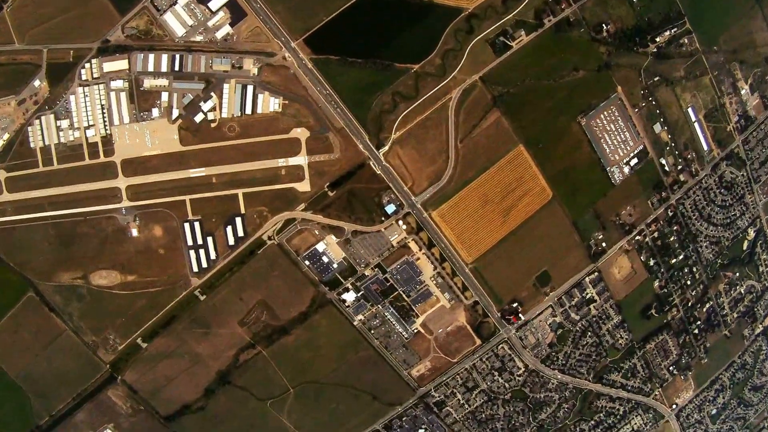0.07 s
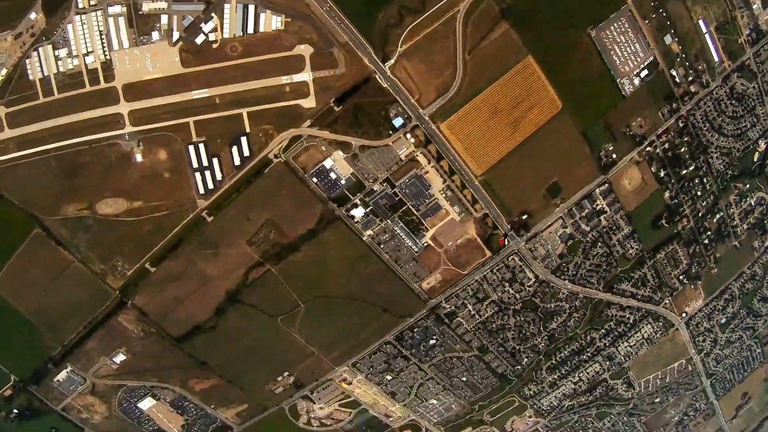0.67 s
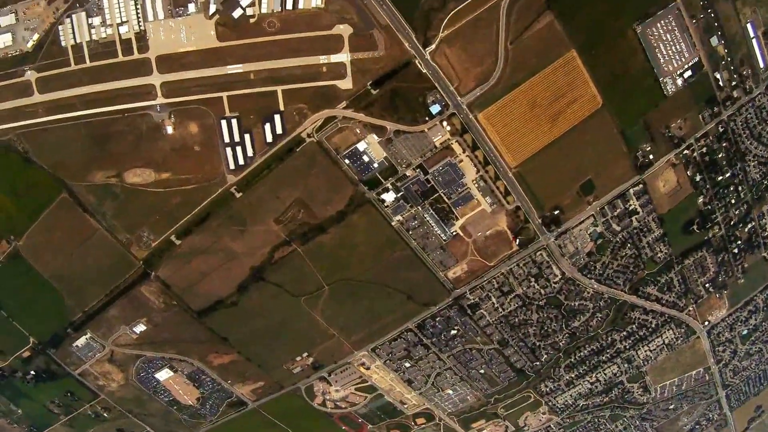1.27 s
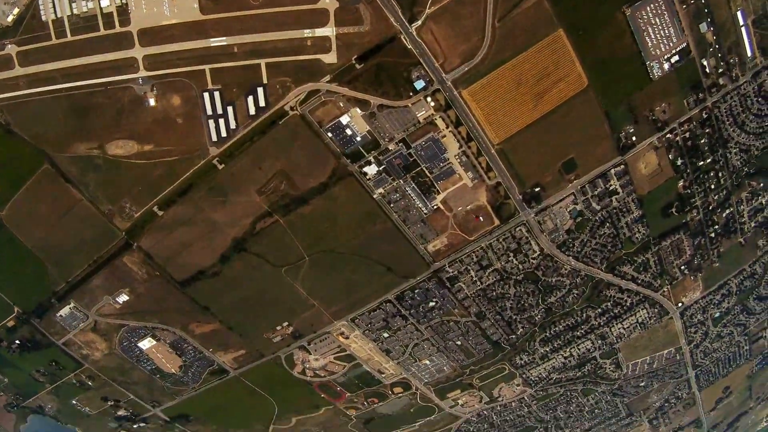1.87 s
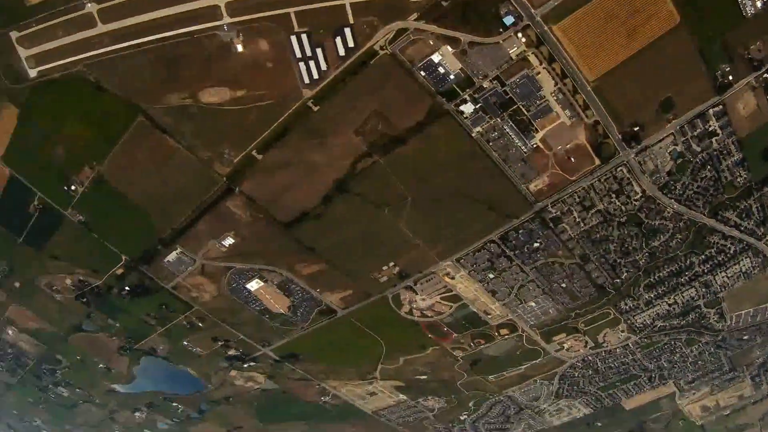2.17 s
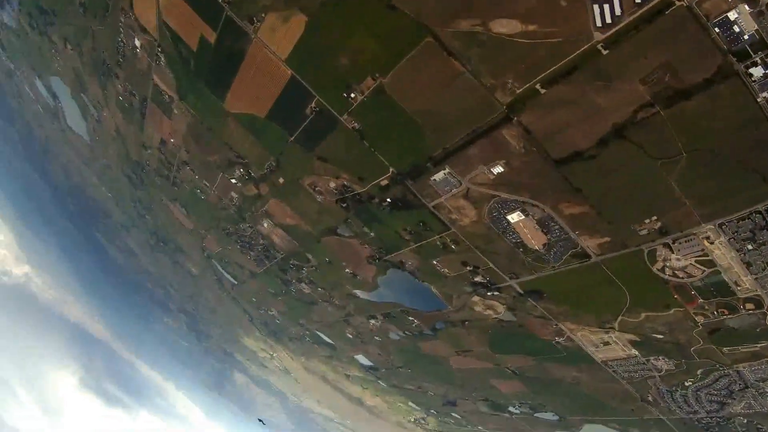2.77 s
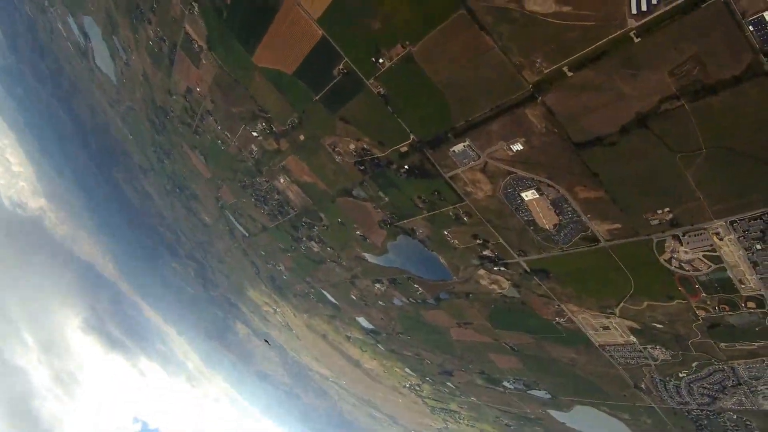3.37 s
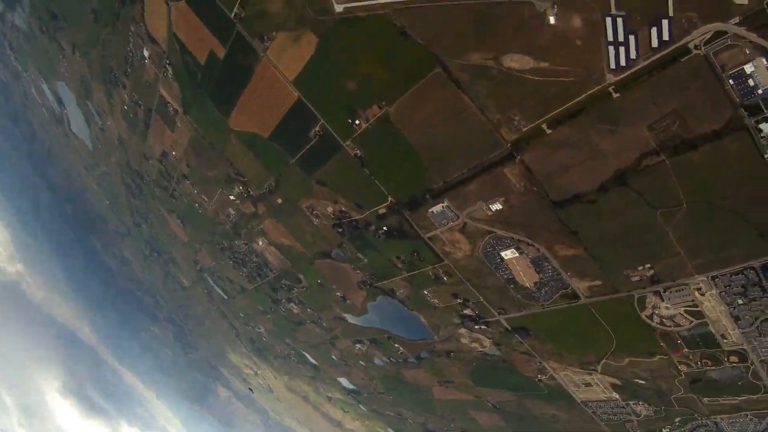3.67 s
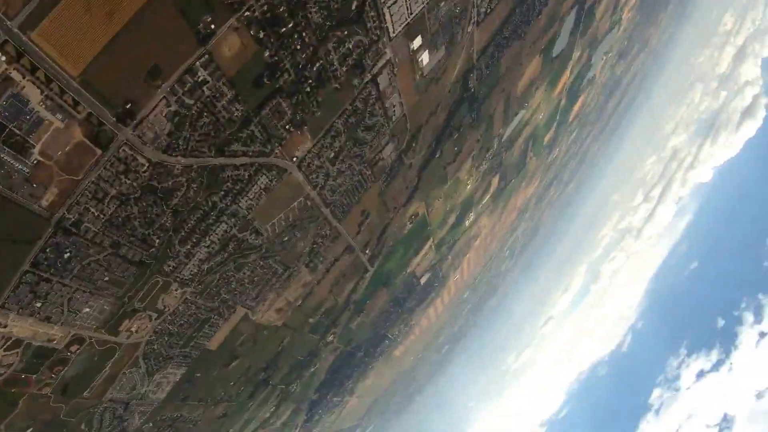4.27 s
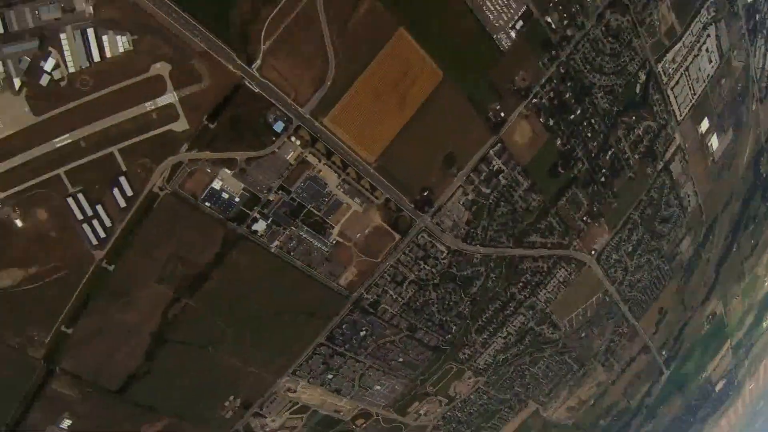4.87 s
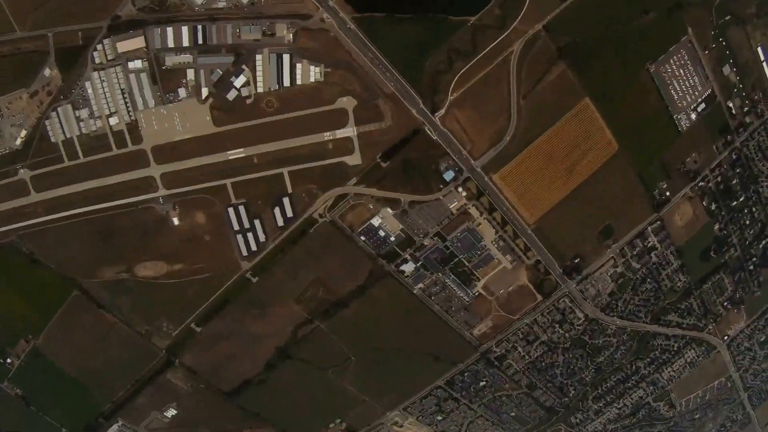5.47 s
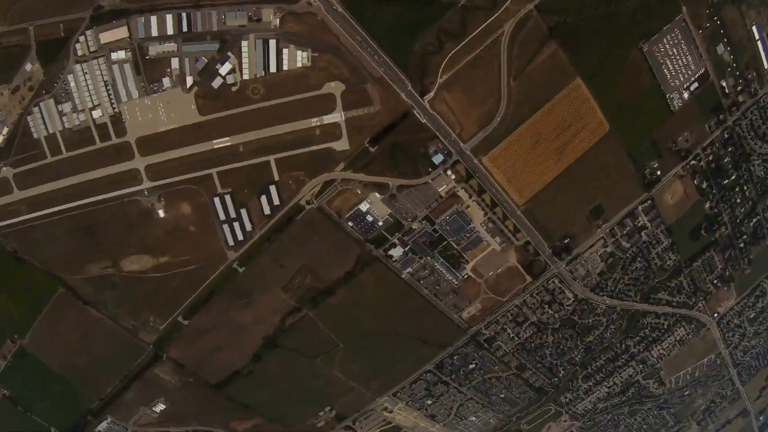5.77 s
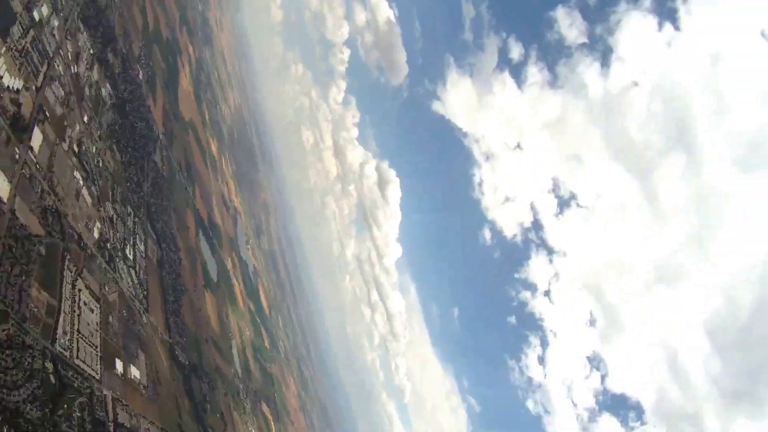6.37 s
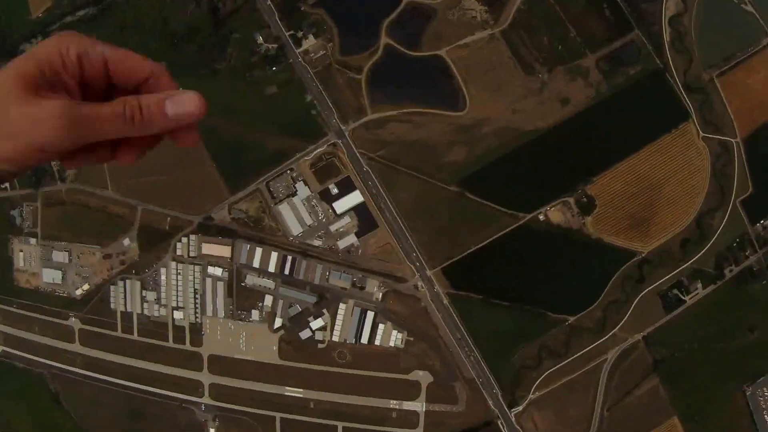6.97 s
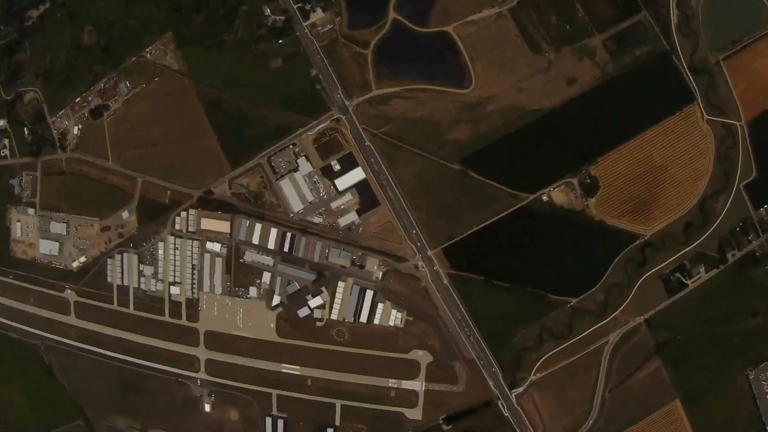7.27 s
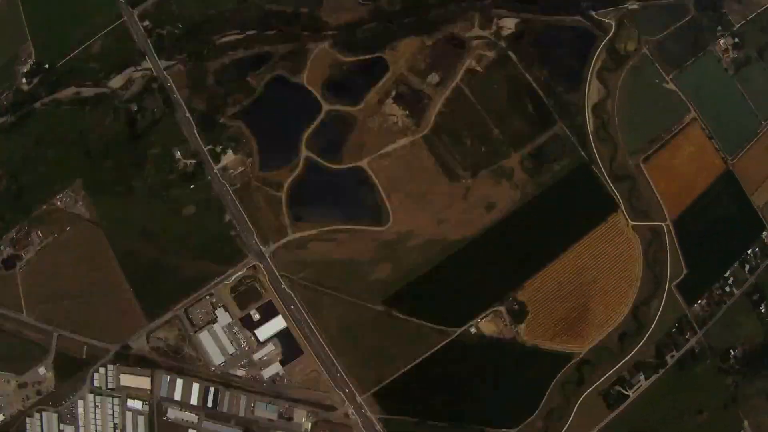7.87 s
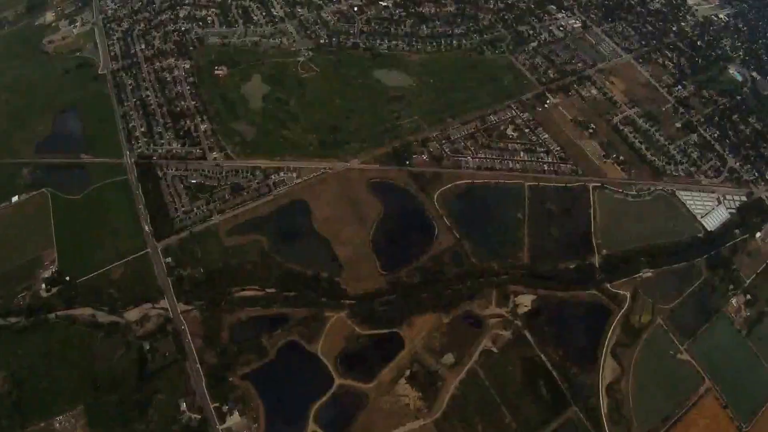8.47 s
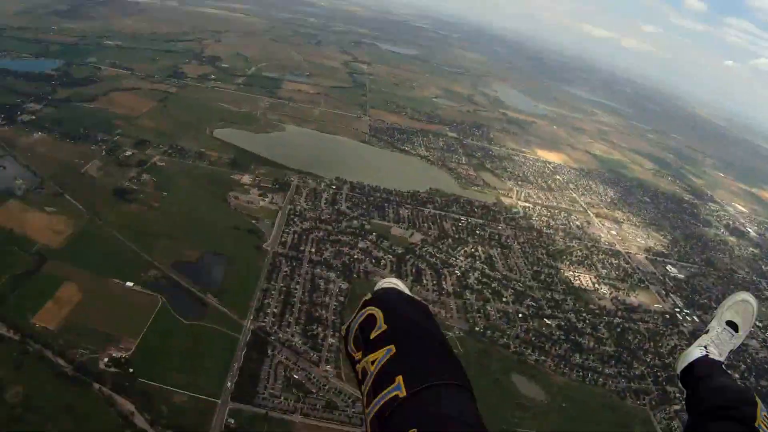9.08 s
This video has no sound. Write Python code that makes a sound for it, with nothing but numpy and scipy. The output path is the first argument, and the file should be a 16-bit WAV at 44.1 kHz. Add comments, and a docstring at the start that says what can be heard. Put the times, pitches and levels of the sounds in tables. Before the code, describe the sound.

Air rushes past a skydiver's helmet in uneven gusts until the parachute roars open, leaving gentler wind, light cloth flaps and a small clack.

```python
"""Freefall wind buffeting a helmet microphone. As the head turns, turbulence hits it as suction spikes,
a fast flutter of vortices shed off the helmet edge, then a dense rush.
Air hisses past the shell and whistles faintly in a gap. The parachute opens with a roar;
in the slower air the cloth flaps and a piece of harness hardware clacks."""
import sys
import numpy as np
from scipy import signal
from scipy.fft import rfft, irfft
from scipy.io import wavfile
from scipy.ndimage import uniform_filter1d

SR = 44100
rng = np.random.default_rng(int(sys.argv[2]) if len(sys.argv) > 2 else 0)


def generate_wav(signal):
    """Clip the signal to [-1, 1] and save it as 16-bit WAV at the path in sys.argv[1]."""
    frames = np.transpose(np.atleast_2d(signal))
    scaled = np.clip(frames, -1, 1) * 32767
    pcm = np.round(scaled).astype(np.int16)
    wavfile.write(sys.argv[1], SR, pcm)


N = 407042
TIME_S = np.arange(N) / SR
FREQ_HZ = np.maximum(np.fft.rfftfreq(N, 1 / SR), 1)

# smooth airstream: time_s, buffet_db, hiss_db
AIRSTREAM = [(0, -50.5, -39.5), (.55, -57, -42.5), (.9, -57.5, -51), (1.4, -56, -47.5), (2.2, -55, -51.5),
             (4.1, -59, -58), (4.6, -65, -61.5), (5.12, -60, -59), (5.3, -63.5, -50), (6, -61.5, -56.5),
             (6.27, -65.5, -67), (6.42, -58, -50.5), (6.8, -66.5, -58), (9.2, -72, -69.5)]
# buffeting spectrum: freq_hz, density_db
BUFFET_SPECTRUM = [(25, -45), (60, -30.5), (120, -19.5), (220, -10), (400, -3), (650, 0.5), (1300, 1),
                   (2000, -4), (3200, -9.5), (4500, -13.5), (6500, -17), (9500, -36.5), (15500, -49)]
# hiss spectrum: freq_hz, density_db
HISS_SPECTRUM = [(1500, -26), (3500, -2.5), (4800, 1.5), (5900, 5.5), (6800, -1), (7800, 0), (9200, -10.5),
                 (12000, -20), (15500, -26)]
# hiss resonance, shifting as the head turns: time_s, pitch_hz
HISS_RESONANCE = [(.5, 6480), (1.3, 7140), (2.6, 6106), (6.3, 6530), (7, 5570), (7.8, 6150), (8.3, 5430),
                  (9.2, 6250)]
# helmet gap whistle: time_s, level_db
WHISTLE_LEVELS = [(0, -44.5), (1.2, -43.5), (2, -46.5), (4.1, -47.5), (4.5, -56), (4.85, -59), (4.97, -47),
                  (5.5, -47.5), (6.2, -47), (6.27, -56.5), (6.8, -52.5), (9.2, -76)]
# gap resonances: pitch_hz, width_hz, level_db
WHISTLE_MODES = [(1492, 170, 2), (1490, 900, -6.5), (1870, 340, -10)]
# gusts from head turns: start_s, end_s, attack_s, hiss_attack_s, release_s, swell_db_per_s,
# mid_buffet_db, bright_db, hiss_db, spike_share
HEAD_GUSTS = [(0.797, 1.853, 0.27, 0.23, 0.75, -3, -50.5, -5, -69, 1),
              (1.745, 2.45, 0.15, .2, 0.11, 18.5, -47, -7.5, -69, 0.88),
              (2.24, 3.08, .21, 0.27, 0.13, 2.5, -30.5, -4.5, -42.5, 0.38),
              (2.92, 3.683, 0.17, 0.1, 0.2, -0.5, -33, -5, -41.5, 0.47),
              (3.481, 4.109, 0.13, 0.25, .13, 6, -30, -5, -42, 0.48),
              (3.967, 4.422, 0.064, 0.073, 0.13, -27, -45, -9.5, -60, 0.68),
              (4.318, 4.882, 0.046, .1, 0.053, 3, -53, -15, -67, 0.6),
              (5.433, 6.11, 0.057, .1, .15, 4, -54, -3.5, -71, 0.8),
              (6.423, 6.767, 0.17, .05, 0.079, 11.5, -39, -6, -49, 0.4),
              (6.814, 7.623, 0.23, 0.16, 0.23, 9.5, -42, 9, -33, .15),
              (7.416, 7.879, 0.17, 0.059, 0.13, -13, -38.5, 0.5, -38.5, 0.2)]
# spells of vortex shedding: start_s, end_s, first_hz, last_hz, peak_share
SHEDDING_SPELLS = [(.9, 2.099, 419.2, 400, 0.07), (1.95, 2.34, 390, 305.3, .24),
                   (2.21, 2.68, 280, 247.1, .85), (3.97, 4.142, 255.6, 314.3, 0.79)]
# largest eddies at the microphone: time_s, level_db, corner_hz
LARGE_EDDIES = [(.999, -28, 1680), (1.021, -29, 1000), (1.081, -32, 2000), (1.121, -29, 1100),
                (1.249, -26, 1600), (1.478, -30, 2500), (1.574, -28, 2500), (2.062, -25, 1100),
                (2.087, -19.5, 1170), (2.172, -16.5, 1800), (2.203, -16.5, 1800), (2.225, -23, 1300),
                (2.243, -15.5, 1800), (2.27, -13, 1400), (2.305, -13.5, 2200), (2.32, -10.5, 1400),
                (2.34, -12.5, 1000), (2.38, -13, 1800), (4.048, -17, 1294), (4.069, -11.5, 890),
                (4.118, -24, 1120), (4.135, -20, 700), (4.304, -21.5, 1190), (4.428, -29, 900),
                (4.541, -28.5, 1000), (4.781, -30, 900), (5.759, -24.5, 1200), (5.79, -26, 2500),
                (5.815, -31, 900), (5.83, -27, 1200), (5.856, -23, 1600), (5.892, -25.5, 1100),
                (5.907, -23.5, 1800)]
# parachute opening: time_s, roar_db, buffet_db, bright_db, hiss_db
CANOPY_OPENING = [(7.7, -85, -60, 18, -44), (7.85, -64, -56.5, 12.5, -34.5), (7.92, -54, -52.5, 10, -39.5),
                  (8.02, -45, -45, 17.5, -31), (8.15, -19.5, -34, 10, -45), (8.25, -22, -32, -4.5, -52),
                  (8.41, -22, -31.5, -3, -41), (8.47, -20.5, -37, 13.5, -49), (8.53, -26, -31, -17, -52),
                  (8.6, -76, -38.5, -23.5, -57), (8.9, -80, -46, -20, -63), (9.23, -85, -50, -18, -66)]
# cloth roar spectrum: freq_hz, density_db
CANOPY_SPECTRUM = [(30, -65), (150, -42), (400, -12), (750, 0), (1100, 4.5), (1500, 2.5), (2300, -3),
                   (3500, -15), (8000, -60)]
# cloth flaps: start_s, level_db, decay_s, top_hz
CLOTH_FLAPS = [(8.982, -38, 0.0068, 5000), (9.016, -44, 0.0044, 5000), (9.035, -35.5, 0.0065, 200),
               (9.151, -36.5, .01, 201), (9.169, -41, 0.012, 450), (9.178, -29, 0.0088, 180),
               (9.183, -27, 0.00066, 6000)]
# harness hardware modes: pitch_hz, level_db, t60_s
HARDWARE_MODES = [(850, -13, 0.026), (1500, -8, 0.031), (1720, -2, 0.013), (2480, -2.5, 0.0064),
                  (2970, 4.5, 0.0035), (4100, -11, 0.0087), (4900, -7, 0.01), (6100, -22, .015)]


def undb(db):
    """Decibels to gain."""
    return 10 ** (np.asarray(db) / 20)


def curves(table):
    """Table columns, interpolated over time."""
    times_s, *columns = np.transpose(table)
    return [np.interp(TIME_S, times_s, column) for column in columns]


def response(spectrum):
    """Gain per frequency bin."""
    hz, db = np.transpose(spectrum)
    return undb(np.interp(np.log(FREQ_HZ), np.log(hz), db))


def colour(x, gain):
    """Filter that keeps the power of a white input."""
    return irfft(rfft(x) * gain / np.sqrt(np.mean(gain ** 2)), N)


def highpass(x, corner_hz):
    """Zero-phase treble part."""
    return irfft(rfft(x) / (1 + (corner_hz / FREQ_HZ) ** 3), N)


def microphone(low_hz, high_hz):
    """Gain of the port behind its wind cover: little bass, soft top."""
    return 1 / np.hypot(1, (low_hz / FREQ_HZ) ** 2) / np.hypot(1, (FREQ_HZ / high_hz) ** 3)


def ramp(x, length):
    """Smooth 0 to 1 as x goes from 0 to length."""
    return np.sin(np.pi / 2 * np.clip(x / length, 0, 1)) ** 2


def wander(rate_hz):
    """Slow random drift, spread near 1."""
    knots = rng.standard_normal(8192)
    return 1.2 * np.interp(TIME_S * rate_hz, np.arange(len(knots)), knots)


def turbulence(flicker_hz, depth_db):
    """Unit-power noise, flickering by depth_db."""
    noise = rng.standard_normal(N) * undb(depth_db * wander(flicker_hz))
    return noise / noise.std()


def airflow(stream_bright_db=1.5):
    """Stream, gusts and opening add in power: buffet_db, bright_db, hiss_db, spike_share."""
    buffet_db, hiss_db = curves(AIRSTREAM)
    parts = [(undb(buffet_db), stream_bright_db, undb(hiss_db), 0)]
    for (start_s, end_s, attack_s, hiss_attack_s, release_s, swell_db_per_s,
         mid_db, bright_db, hiss_db, spike_share) in HEAD_GUSTS:
        fade = ramp(end_s - TIME_S, release_s)
        from_mid_s = np.clip(TIME_S, start_s, end_s) - (start_s + end_s) / 2
        push = undb(mid_db + swell_db_per_s * from_mid_s) * ramp(TIME_S - start_s, attack_s)
        skim = undb(hiss_db) * ramp(TIME_S - start_s, hiss_attack_s)
        parts.append((push * fade, bright_db, skim * fade, spike_share))
    _, buffet_db, bright_db, hiss_db = curves(CANOPY_OPENING)
    opened = TIME_S > CANOPY_OPENING[0][0]
    parts.append((undb(buffet_db) * opened, bright_db, undb(hiss_db) * opened, 0.34))
    power = treble_power = hiss_power = spike_power = 0
    for push, bright_db, skim, spike_share in parts:
        power += push ** 2
        treble_power += (push * undb(bright_db)) ** 2
        hiss_power += skim ** 2
        spike_power += spike_share * push ** 2
    buffet_db, bright_db, hiss_db = 10 * np.log10([power, treble_power / power, hiss_power])
    return buffet_db, bright_db, hiss_db, np.clip(spike_power / power, 0, 1)


def uneven_air(drive_db, spike_share, knee_db=-49, doubling_db=6.5):
    """Dense eddies, regular shedding, and lone spikes that crowd as the drive rises."""
    spikes_per_s = 125 * 2 ** (np.maximum(drive_db - knee_db, 0) / doubling_db)
    dense = turbulence(flicker_hz=110, depth_db=0.5)
    spikes = suction_spikes(spikes_per_s, scatter_db=2.8)
    eddies = np.sqrt(1 - spike_share) * dense + np.sqrt(spike_share) * spikes
    shed_hz, shed_share = shedding_spells()
    flutter = vortex_shedding(shed_hz, jitter=0.1, scatter_db=3.0, spray=2.4, throb=0.49, focus=6.2)
    return np.sqrt(1 - shed_share) * eddies + np.sqrt(shed_share) * flutter


def buffeting(air, buffet_db, bright_db):
    """Pressure on the microphone: smaller eddies and more treble in fast air, more bass in gentle air."""
    pressure = colour(air, response(BUFFET_SPECTRUM))
    treble = highpass(pressure, corner_hz=1460)
    bass = pressure - highpass(pressure, corner_hz=306)
    bass_db = 5.5 * ramp(-42 - buffet_db, 12) - 0.5  # rises as buffet_db falls from -42 to -54
    shaped = pressure + treble * (undb(bright_db + 4.5) - 1) + bass * (undb(bass_db) - 1)
    return shaped * undb(buffet_db + 4.0)


def shell_hiss(level_db, half_width_hz, even_db=-41):
    """Fine turbulence skims the shell; above even_db a moving resonance dominates."""
    plain = colour(turbulence(flicker_hz=120, depth_db=1.0), response(HISS_SPECTRUM))
    band = 1 / (1 + (FREQ_HZ / half_width_hz) ** 2)
    phase = 2 * np.pi * np.cumsum(curves(HISS_RESONANCE)[0]) / SR
    ring = sum(colour(rng.standard_normal(N), band) * wave(phase) for wave in (np.cos, np.sin))
    ring_gain = undb(0.46 * (level_db - even_db))
    return (plain + ring_gain * ring) / np.hypot(1, ring_gain) * undb(level_db - 0.5)


def gap_whistle():
    """Air across a gap rings a broad, breathy resonance with no bass."""
    modes = sum(undb(db) / (1 + ((FREQ_HZ / hz - hz / FREQ_HZ) * hz / width_hz) ** 2)
                for hz, width_hz, db in WHISTLE_MODES)
    gain = modes / np.hypot(1, (750 / FREQ_HZ) ** 4)
    return colour(turbulence(flicker_hz=36, depth_db=0), gain) * undb(curves(WHISTLE_LEVELS)[0])


def suction_spikes(rate_per_s, scatter_db):
    """Vortices pass at random moments; zero mean, unit power."""
    size = undb(scatter_db * np.clip(rng.standard_normal(N), -2, 2))
    chance = rate_per_s / SR
    hits = (rng.random(N) < chance) * size
    return (chance * size.mean() - hits) / np.sqrt(chance * np.mean(size ** 2))


def shedding_spells():
    """Each spell swells and fades while its rate glides: rate_hz, share of the buffeting."""
    share = 1e-9
    weighted_hz = share * SHEDDING_SPELLS[0][2]
    for start_s, end_s, first_hz, last_hz, peak_share in SHEDDING_SPELLS:
        progress = np.clip((TIME_S - start_s) / (end_s - start_s), 0, 1)
        swell = peak_share * np.sin(np.pi * progress)
        share += swell
        weighted_hz += swell * (first_hz + (last_hz - first_hz) * progress)
    return weighted_hz / share, np.clip(share, 0, 1)


def vortex_shedding(rate_hz, jitter, scatter_db, spray, throb, focus):
    """One suction spike a cycle, with a spray of small eddies and a pressure swing around it."""
    cycles = np.cumsum(rate_hz * (1 + jitter * wander(170))) / SR
    swing = np.cos(2 * np.pi * cycles)
    spike = np.diff(np.floor(cycles), prepend=0) * np.sqrt(SR / rate_hz)
    burst = np.exp(focus * (swing - 1)) * rng.standard_normal(N)
    return (spray * burst - 0.55 * spike) * undb(scatter_db * wander(210)) - throb * swing


def large_eddies(wake_s, wake_db, spurt_db, twin_lag_s, twin_db, gain_db):
    """Each is a suction cusp in a ragged wake, with a spurt of hiss; a weaker twin trails it."""
    out = np.zeros(N)
    t = np.arange(-256, 257) / SR
    for time_s, level_db, corner_hz in LARGE_EDDIES:
        cusp = np.exp(-2 * np.pi * corner_hz * np.abs(t))
        for lag_s, drop_db in ((0, 0), (twin_lag_s, twin_db)):
            spurt = rng.standard_normal(len(t)) * np.exp(-np.abs(t) / wake_s)
            wake = np.convolve(spurt, cusp, "same")
            eddy = undb(wake_db) * wake / np.abs(wake).max() - cusp + undb(spurt_db) * spurt / cusp.sum()
            first = int((time_s + lag_s) * SR) - len(t) // 2
            out[first:first + len(t)] += undb(level_db + drop_db + gain_db) * eddy
    return irfft(rfft(out) * microphone(low_hz=433, high_hz=6900), N)


def hiss_spurts(air, buffet_db, fade_s, depth, contrast, onset_db=-51):
    """Gain on the hiss: in strong buffeting, one spurt behind each eddy."""
    pole = np.exp(-1 / (fade_s * SR))
    power = signal.lfilter([1 - pole], [1, -pole], air ** 2) ** contrast
    power /= uniform_filter1d(power, size=3000)
    share = np.clip(depth * (buffet_db - onset_db) / 10, 0, 1)
    return np.sqrt(1 - share + share * power)


def canopy_roar():
    """The cloth catches the air and shakes open."""
    roar = colour(turbulence(flicker_hz=150, depth_db=1.0), response(CANOPY_SPECTRUM))
    return roar * undb(curves(CANOPY_OPENING)[0]) * (TIME_S > CANOPY_OPENING[0][0])


def cloth_flaps():
    """The open canopy and its slider flap in short puffs."""
    out = np.zeros(N)
    port = microphone(low_hz=240, high_hz=5260)
    for start_s, level_db, decay_s, top_hz in CLOTH_FLAPS:
        puff = rng.standard_normal(N) * (TIME_S >= start_s) * np.exp(-np.abs(TIME_S - start_s) / decay_s)
        out += undb(level_db) * colour(puff, port / np.hypot(1, FREQ_HZ / top_hz))
    return out


def harness_clack(start_s, ring_db, crack_db, crack_s):
    """Small hard contact: a short crack and fast-dying modes, no bass."""
    t = np.maximum(TIME_S - start_s, 0)
    ring = sum(undb(db - 60 * t / t60_s) * np.sin(2 * np.pi * hz * t) for hz, db, t60_s in HARDWARE_MODES)
    crack = rng.standard_normal(N) * np.exp(-t / crack_s) * (t > 0)
    band = signal.butter(3, [650, 8000], "bandpass", fs=SR, output="sos")
    return signal.sosfilt(band, undb(crack_db) * crack - undb(ring_db) * ring)


def scene():
    """Air and gear at one microphone."""
    buffet_db, bright_db, hiss_db, spike_share = airflow()
    air = uneven_air(buffet_db + np.maximum(bright_db, 0), spike_share)
    wind = buffeting(air, buffet_db, bright_db)
    wind += large_eddies(wake_s=0.00064, wake_db=-6.5, spurt_db=-8,
                         twin_lag_s=0.004, twin_db=-8, gain_db=2.0)
    hiss = shell_hiss(hiss_db, half_width_hz=770)
    hiss *= hiss_spurts(air, buffet_db, fade_s=0.0005, depth=0.85, contrast=0.99)
    whistle = gap_whistle()
    cloth = canopy_roar() + cloth_flaps()
    clack = harness_clack(start_s=9.0697, ring_db=-17.5, crack_db=-15.5, crack_s=0.0008)
    return (wind + hiss + whistle + cloth + clack)[None]


def record(dry):
    """The helmet camera sheds the deepest rumble and cuts the top."""
    low_cut = signal.butter(1, 30, "highpass", fs=SR, output="sos")
    top_cut = signal.ellip(10, 0.2, 70, 15450, fs=SR, output="sos")
    return signal.sosfilt(top_cut, signal.sosfilt(low_cut, dry))


dry = scene()
out = record(dry)
generate_wav(out)
```